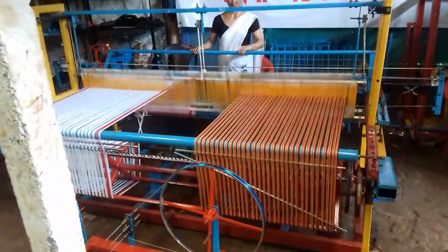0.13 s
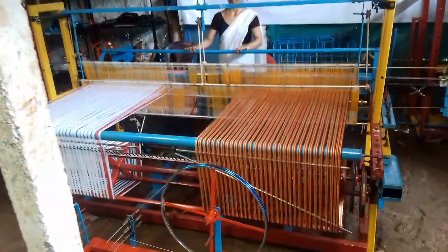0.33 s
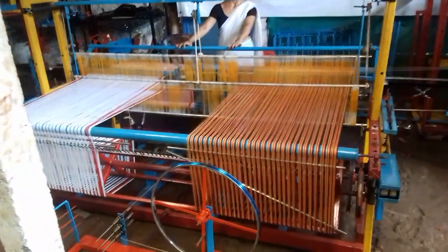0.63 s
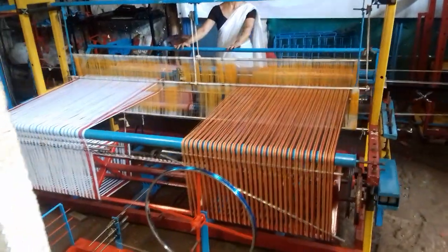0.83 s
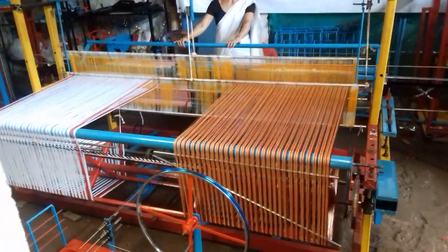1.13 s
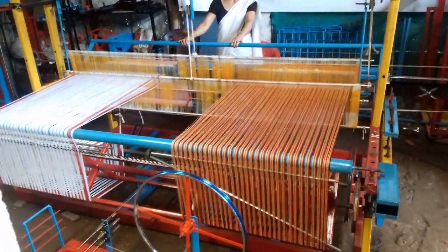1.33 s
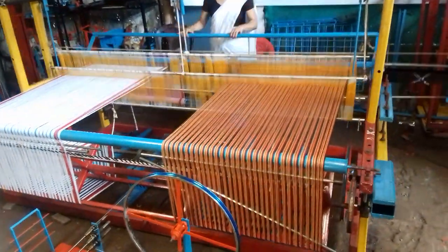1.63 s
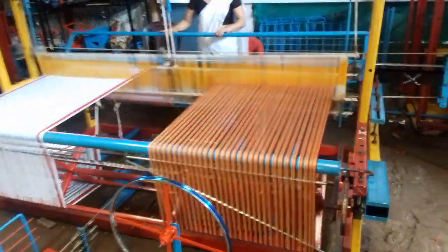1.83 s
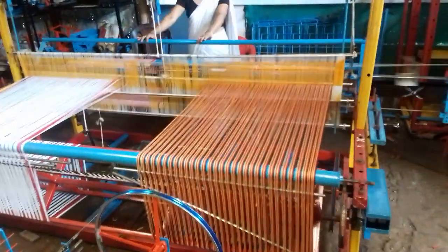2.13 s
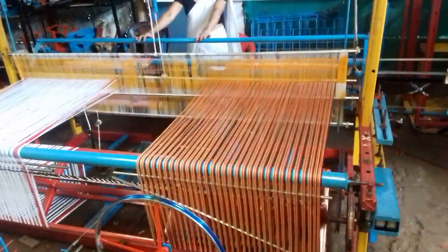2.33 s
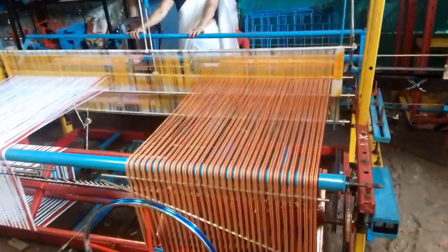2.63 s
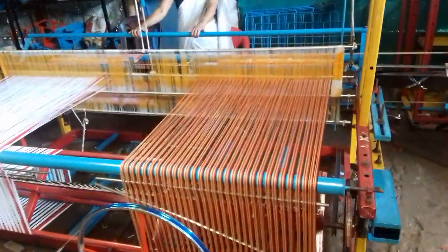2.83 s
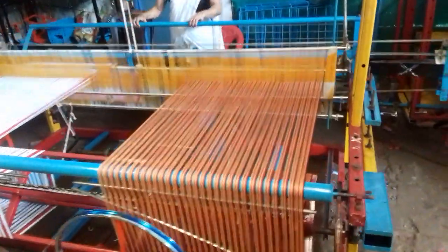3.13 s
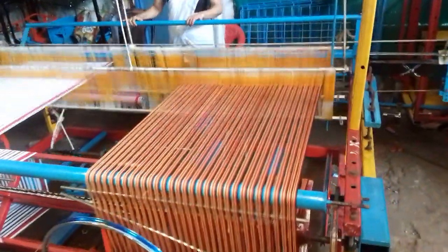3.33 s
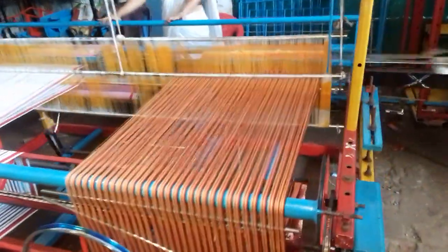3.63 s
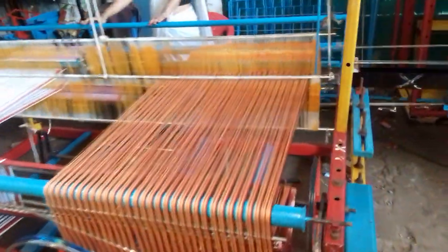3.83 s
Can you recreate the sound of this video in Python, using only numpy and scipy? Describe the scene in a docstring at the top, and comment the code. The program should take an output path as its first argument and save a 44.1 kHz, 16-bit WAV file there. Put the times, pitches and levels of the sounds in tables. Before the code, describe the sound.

A working loom clacks and knocks loudly, its metal parts jangling and its wires scraping. Between bursts of clatter the shuttle rattles along and bumps home, heard with some workshop reverberation and a soft wash of noise.

```python
"""The levers and heddle frames of a handloom clack and chatter, one pick about every second and a half.
Each impact excites damped modes: the beater knocks the wooden frame and sets the steel reed ringing.
The shuttle rattles along the race, which sings by resonance, and bumps into its box. Wires scrape
and tick. The hard walls of the workshop add reverberation, over a steady wash of noise."""
import sys
import numpy as np
from scipy import signal
from scipy.io import wavfile
from scipy.ndimage import uniform_filter1d

SR = 44100
rng = np.random.default_rng(int(sys.argv[2]) if len(sys.argv) > 2 else 0)


def put_to_file(sound):
    """Save the sound as 16-bit audio at rate SR, in the file named by the first command-line argument."""
    columns = np.atleast_2d(sound).T  # one column per channel
    safe = np.clip(columns, -1, 1)
    whole_steps = np.round(safe * 32767)
    wavfile.write(sys.argv[1], SR, whole_steps.astype(np.int16))


N = 176400

# Impacts of levers and heddle frames: t/s, level/dB, chatter decay/s, treble tilt/(dB per octave)
LEVER_CLACKS = [(.162, -11, 0.04, -9.5), (.194, -4.5, 0.022, -1.5), (0.276, -10.5, 0.043, -5.5),
                (.602, -8, 0.015, -4.5), (.646, -6.5, 0.07, -5.5), (.743, -3, 0.19, -5.5),
                (1.022, -7.5, 0.037, -4.5), (1.759, -7.5, 0.037, -8), (1.795, -14.5, .03, -2.5),
                (1.864, -14.5, 0.082, -2.5), (2.218, -4.5, 0.083, -1.5), (2.341, -6, .037, -4),
                (2.4096, -6, 0.026, -4), (2.589, -13, 0.04, -5), (3.304, -8.5, .035, -5.5),
                (3.3338, -4, 0.079, -4), (3.722, -10, 0.029, -4.5), (3.76, -5.5, 0.11, -5),
                (3.893, -6, 0.058, 1.5)]
# Spectral envelope of a clack: f/Hz, level/dB
CLACK_SPECTRUM = [(70, -83), (400, -32.5), (950, -7), (2800, 2.5), (5000, -3.5), (7300, 1), (8800, -6),
                  (15500, -26)]
# Modes of the levers and rods: f/Hz, level/dB, T60/s
ROD_MODES = [(2333, 0.5, 0.13), (3430, -1, .2), (4830, -9, 0.27), (5910, 0.5, 0.11), (6640, 6.5, 0.23),
             (7484, -3, 0.13)]


def levers():
    """Impact excitation: each clack rings the modes of the rods and clinks a few small fittings."""
    out = np.zeros(N)
    for s, db, decay_s, tilt_db in LEVER_CLACKS:
        hit = amp(db) * impact(decay_s, crack_db=-8, crack_s=0.01, per_s=1000, spread_db=2.8)
        clink = through(hit, jangle(low_hz=3967, high_hz=14460, t60=0.0083, count=7))
        body = through(hit + amp(-2.5) * clink, colour(CLACK_SPECTRUM, tilt_db))
        rods = through(hit, ring(ROD_MODES, uneven_db=10))
        add(out, s, amp(23) * body + amp(13) * rods)
    return out


# Knocks of the beater: t/s, level/dB, f/Hz of the struck spot
BEATER_KNOCKS = [(.465, -4.5, 1400), (.511, -7.5, 1690), (.905, -12.5, 1010), (1.385, -23, 1430),
                 (1.478, -25, 670), (1.57, -19, 1230), (2.029, -13, 1350), (2.088, -10.5, 1310),
                 (2.125, -10, 1720), (2.41, -8, 1026), (2.463, -14, 1390), (3.03, -23.5, 670),
                 (3.339, -16, 1260), (3.6, -3.5, 2160), (3.635, -6.5, 1390), (3.665, -11.5, 1080),
                 (3.829, -12.5, 970)]
# Spectral envelope of a knock: f/Hz, level/dB
KNOCK_SPECTRUM = [(70, -84), (230, -40), (330, -19.5), (520, -15), (1000, 0.5), (5000, -8), (14000, -21)]
# Modes of the frame: f/Hz, level/dB, T60/s
FRAME_MODES = [(333, -7, 0.19), (953, 1, 0.39)]


def beater():
    """Damped resonance of wood: a knock excites the frame's modes and a broad peak of the struck spot."""
    drive, spots = np.zeros((2, N))
    for s, db, hz in BEATER_KNOCKS:
        hit = impact(decay_s=0.024, crack_db=1, crack_s=0.0046, per_s=1200, spread_db=2.5, rise_s=0.008)
        add(drive, s, amp(db) * hit)
        add(spots, s, amp(db) * resonate(hit, hz, q=3.6))
    body = amp(21.5) * through(drive, colour(KNOCK_SPECTRUM))
    frame = amp(12.5) * through(drive, ring(FRAME_MODES))
    lowpass = signal.butter(2, 5000, fs=SR, output="sos")
    return signal.sosfilt(lowpass, body + frame + amp(16) * spots)


# Jolts of the steel reed: t/s, level/dB, f/Hz most strongly excited
REED_JOLTS = [(0, -13, 4870), (0.056, -14.5, 3400), (.366, -10.5, 3460), (0.5016, -5, 7000),
              (.926, -9.5, 7100), (1.5924, -12.5, 6150), (1.616, -16, 6260), (1.945, -10.5, 6300),
              (2.0404, -9.5, 6800), (2.0902, -3, 6600), (2.125, -7, 3400), (3.0928, -18.5, 3380),
              (3.238, -17.5, 5940), (3.48, -9.5, 4270), (3.635, -5, 7130)]
# Modes of the reed: f/Hz, level/dB, T60/s
REED_MODES = [(1301.4, -1.5, 0.6), (1384, 1.5, 0.22), (1792, -2.5, 0.23), (2386, -3, 0.45),
              (3347, 1.5, 0.17), (4200, -2.5, .2), (4995, -1.5, 0.21), (6252, -1, 0.17), (6460, -0.5, 0.17),
              (7040, -1, 0.25), (7300, -0.5, 0.15), (7900, -5, 0.28)]
# Spectral envelope of the rasp: f/Hz, level/dB
RASP_SPECTRUM = [(90, -61), (700, -1), (1350, 3), (6300, -2), (11000, -13.5), (15500, -43)]
FAVOUR_DB, FAVOUR_OCTAVES = 7, 0.22  # height and width of the boost around a jolt's frequency
RASP_GROWTH = 0.99  # dB of rasp per dB of jolt


def reed():
    """Free vibration of steel: a jolt rings the reed's modes while its many wires rasp in their slot."""
    drive, ringing = np.zeros((2, N))
    for s, db, favoured_hz in REED_JOLTS:
        hit = impact(decay_s=0.044, crack_db=-2, crack_s=0.013, per_s=2500, spread_db=4.5, rise_s=0.0016)
        modes = []
        for hz, mode_db, t60 in REED_MODES:
            nearness = np.exp(-(np.log2(hz / favoured_hz) / FAVOUR_OCTAVES) ** 2)
            modes.append((hz, mode_db + FAVOUR_DB * nearness, t60))
        add(drive, s, amp(RASP_GROWTH * db) * hit)
        add(ringing, s, amp(db) * unit(through(hit, ring(modes, count=5))))
    wires = through(drive, jangle(low_hz=598.7, high_hz=15390, t60=0.15, count=90))
    rasp = through(amp(10.5) * drive + amp(16) * wires, colour(RASP_SPECTRUM))
    return rasp + amp(21.5) * ringing


# Envelope of the shuttle's run: t/s, level/dB
SHUTTLE_RUN = [(.48, -47), (.62, -28), (.9, -24), (1.179, -22.5), (1.3, -37.5), (1.42, -72), (2.17, -50),
               (2.27, -21.5), (2.5, -28.5), (2.681, -23), (2.86, -27.5), (2.95, -46), (3.58, -49),
               (3.8, -20.5)]
# Spectral envelope of its rattle: f/Hz, level/dB
RATTLE_SPECTRUM = [(90, -67), (1000, -1), (1700, 5), (4200, 6), (5300, -3), (7200, -4), (15500, -37)]
# Bumps into the shuttle box: t/s, level/dB, chatter decay/s, f/Hz of the struck spot
BOX_BUMPS = [(1.133, -8, 0.048, 4100), (2.244, -6, 0.098, 2900), (2.745, -8, .02, 1650),
             (2.767, -13.5, 0.043, 1540), (2.788, -5, 0.02, 2660)]
# Spectral envelope of a bump: f/Hz, level/dB
BUMP_SPECTRUM = [(140, -45), (2000, -1.5), (4300, 10.5), (7300, -5), (14000, -44)]


def shuttle():
    """Random impact excitation: the shuttle rattles along the race, then bumps into its box."""
    envelope = np.sqrt(N) * amp(np.interp(np.arange(N) / SR, *np.transpose(SHUTTLE_RUN)))
    rattle = smear(unit(clicks(N, per_s=1500, spread_db=2.5)) * envelope, decay_s=0.00068)
    bumps, spots = np.zeros((2, N))
    for s, db, decay_s, hz in BOX_BUMPS:
        hit = impact(decay_s, crack_db=1.5, crack_s=0.0087, per_s=700, spread_db=3.5)
        add(bumps, s, amp(db) * hit)
        add(spots, s, amp(db) * resonate(hit, hz, q=3.5))
    running = amp(1.5) * through(rattle, colour(RATTLE_SPECTRUM)) + race(rattle)
    box = amp(16.5) * through(smear(bumps, decay_s=0.0017), colour(BUMP_SPECTRUM))
    return running + box + amp(18) * spots


def race(rattle, hz=2506, t60=0.59, waver_hz=13.6):
    """Energy storage in a resonator: the race gathers the rattle and radiates one wavering note."""
    retained = amp(-120 / t60 / SR)  # fraction of energy left after one sample
    amplitude = np.sqrt(signal.lfilter([1 - retained], [1, -retained], rattle ** 2))
    waver = unit(uniform_filter1d(rng.standard_normal(N), size=300)) * np.sqrt(N)
    phase = 2 * np.pi * np.cumsum(hz + waver_hz * waver) / SR
    return amp(-4.5) * amplitude * np.sin(phase)


# Scrapes of the heddle wires: t/s, level/dB, duration/s, f/Hz
HEDDLE_SCRAPES = [(0.196, -4.5, 0.06, 5900), (1.018, -11.5, 0.062, 5600), (1.393, -21.5, 0.067, 6680),
                  (2.623, -12, 0.08, 7040), (2.791, -12.5, 0.13, 6960), (3.341, -11, 0.098, 5900),
                  (3.838, -4, 0.05, 6850)]


def heddles():
    """Friction noise: wires slide past each other in a gritty swish that swells and drops."""
    out, t = np.zeros(N), np.arange(SR // 4) / SR
    for s, db, length_s, hz in HEDDLE_SCRAPES:
        swell = np.sin(np.pi * np.minimum(t / length_s, 1))
        grit = swell * clicks(len(t), per_s=1500, spread_db=3.5)
        add(out, s, amp(db + 19.5) * resonate(grit, hz, q=3.8))
    return out


# Ticks of loose wires: t/s, level/dB, f/Hz, T60/s
WIRE_TICKS = [(.697, -11.5, 8500, 0.049), (.7435, -7.5, 10380, 0.012), (3.535, -20, 8005, 0.97),
              (3.635, -3.5, 7670, 0.0074)]


def loose_wires():
    """Damped harmonic motion: each wire ticks with one high, exponentially decaying note."""
    out, t = np.zeros(N), np.arange(SR // 4) / SR
    for s, db, hz, t60 in WIRE_TICKS:
        add(out, s, amp(db - 60 * t / t60) * np.sin(2 * np.pi * hz * t))
    return out


# Reverberation time of the workshop: f/Hz, T60/s
ROOM_DECAY = [(500, 0.84), (4000, 0.54), (8000, 0.51), (15000, 0.14)]


def room(x):
    """Diffuse reverberation: dense reflections build up, then each band decays at its own rate."""
    hz, t, bands = signal.stft(rng.standard_normal(SR * 2 // 3), SR, nperseg=256)
    decay = amp(-60 * t / read(ROOM_DECAY, hz)[:, None])
    tail = signal.istft(bands * decay, SR, nperseg=256)[1]
    build_up = 1 - np.exp(-np.arange(len(tail)) / SR / 0.01)
    return through(x, unit(tail * build_up))


# Spectral envelope of the workshop background: f/Hz, level/dB
BACKGROUND_SPECTRUM = [(30, -13), (95, 0), (150, -10.5), (800, 1), (3000, -0.5), (10000, -16), (15500, -39)]


def background():
    """Stationary filtered noise: the steady wash of the workshop."""
    return amp(-37.5) * through(rng.standard_normal(N), colour(BACKGROUND_SPECTRUM))


def impact(decay_s, crack_db, crack_s, per_s, spread_db, rise_s=0.00061):
    """Transient excitation: a short crack, then loose parts chatter and settle."""
    t = np.arange(SR // 3) / SR
    crack = unit(rng.standard_normal(len(t)) * np.exp(-t / crack_s))
    settling = np.exp(-(t / (1.44 * decay_s)) ** 1.65)
    chatter = unit(clicks(len(t), per_s, spread_db) * settling)
    return unit((amp(crack_db) * crack + chatter) * (1 - np.exp(-t / rise_s)))


def clicks(samples, per_s, spread_db):
    """Poisson process: small independent impacts of uneven size."""
    size = amp(spread_db * np.minimum(rng.exponential(1, samples), 4))
    return size * rng.choice([-1, 1], samples) * (rng.random(samples) < per_s / SR)


def ring(modes, uneven_db=0, count=3):
    """Modal superposition: decaying clusters of close, beating partials; uneven_db varies their levels."""
    t = np.arange(SR // 2) / SR
    out = np.zeros(len(t))
    for hz, db, t60 in modes:
        cluster_hz = hz * (1 + 0.00704 * np.linspace(-1, 1, count)[:, None])
        sines = rng.choice([-1., 1.], count) @ np.sin(2 * np.pi * cluster_hz * t)
        out += amp(db + uneven_db * rng.uniform(-1, 1) - 60 * t / t60) * sines
    return unit(out * (1 - np.exp(-t / 0.00034)))


def jangle(low_hz, high_hz, t60, count):
    """Inharmonic ringing: small steel parts, each with its own natural frequency."""
    t = np.arange(SR // 3) / SR
    hz = low_hz + (high_hz - low_hz) * (np.arange(count) + rng.random(count)) / count
    partials = np.sin(2 * np.pi * (hz[:, None] * t + rng.random((count, 1))))
    return unit(partials.sum(0) * amp(-60 * t / t60))


def smear(x, decay_s):
    """Modal overlap: the dense, quick ringing of wood spreads each click into a noise burst."""
    t = np.arange(2048) / SR
    return through(x, unit(rng.standard_normal(len(t)) * np.exp(-t / decay_s)))


def resonate(x, hz, q):
    """Band-pass resonance, applied twice for steep skirts and scaled to unit energy."""
    b, a = signal.iirpeak(hz, q, fs=SR)
    return unit(signal.lfilter(b, a, signal.lfilter(b, a, x)))


def colour(spectrum, tilt_db=0, size=4096):
    """Minimum-phase impulse response of a spectrum, tilted by tilt_db per octave above about 1500 Hz."""
    hz = abs(np.fft.fftfreq(size, 1 / SR))
    log_gain = np.log(amp(read(spectrum, hz) + tilt_db * np.log2(1 + hz / 1500)))
    transfer = np.exp(np.conj(signal.hilbert(log_gain)))
    return unit(np.fft.ifft(transfer).real[:size // 2])


def through(x, response):
    """Convolution with an impulse response, cut to the input's length."""
    return signal.fftconvolve(x, response)[:len(x)]


def add(mix, s, sound):
    """Superposition of a sound on the mix, starting at s seconds."""
    part = mix[max(round(s * SR), 0):][:len(sound)]
    part += sound[:len(part)]


def read(points, hz):
    """Interpolation on a log-frequency axis."""
    f, value = np.transpose(points)
    return np.interp(np.log(hz + 1), np.log(f), value)


def unit(x):
    """Normalisation to unit energy."""
    return x / np.sqrt(np.sum(x ** 2) + 1e-20)


def amp(db):
    """Amplitude ratio of a level in decibels."""
    return 10 ** (np.asarray(db) / 20)


def scene():
    """Superposition of direct and reverberant sound: each part has its own room response."""
    parts = [levers(), beater(), reed(), heddles(), shuttle(), loose_wires()]
    loom = sum(part + amp(-4) * room(part) for part in parts)
    return (loom + background())[None]


# A brief dip in the overall level: t/s, level/dB
LEVEL_DIP = [(2.185, -0.5), (2.208, -6.5), (2.216, -10.5), (2.221, -1.5)]


def record(dry, threshold_db=-11, recovery_db_per_s=120, cutoff_hz=15800):
    """Compression holds down loud blows and the level dips once; soft clipping and band limits follow."""
    t = np.arange(N) / SR
    power_db = 10 * np.log10(abs(uniform_filter1d(dry[0] ** 2, size=300)) + 1e-12)
    recovery_db = recovery_db_per_s * t
    peak_db = np.maximum.accumulate(power_db + recovery_db) - recovery_db
    reduction_db = 0.26 * uniform_filter1d(np.maximum(peak_db - threshold_db, 0), size=100)
    dip_db = np.interp(t, *np.transpose(LEVEL_DIP))
    clipped = np.tanh(dry * amp(dip_db - reduction_db))
    thinned = signal.sosfilt(signal.butter(2, 190, "highpass", fs=SR, output="sos"), clipped)
    lowpass = signal.firwin(511, cutoff_hz, window=("kaiser", 9), fs=SR)
    return signal.oaconvolve(thinned, lowpass[None], "same")


dry = scene()
out = record(dry)
put_to_file(out)
```